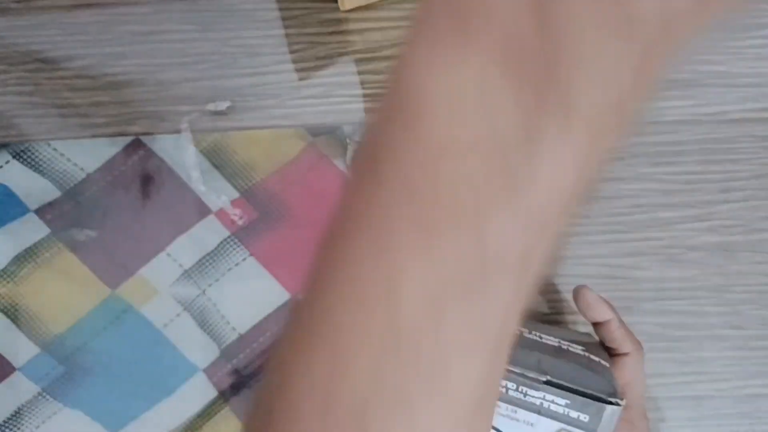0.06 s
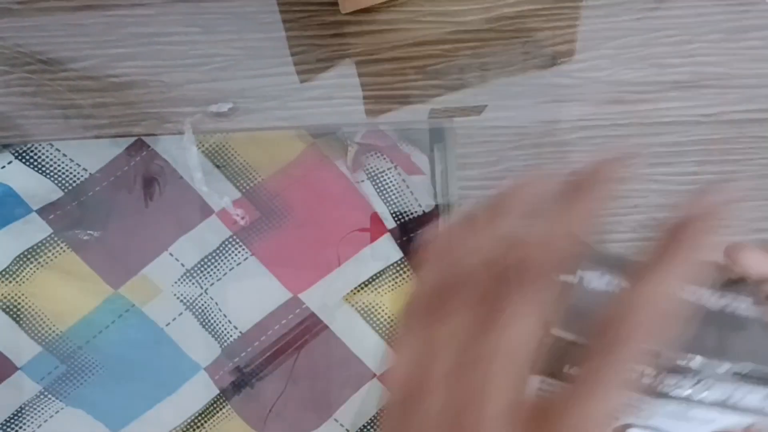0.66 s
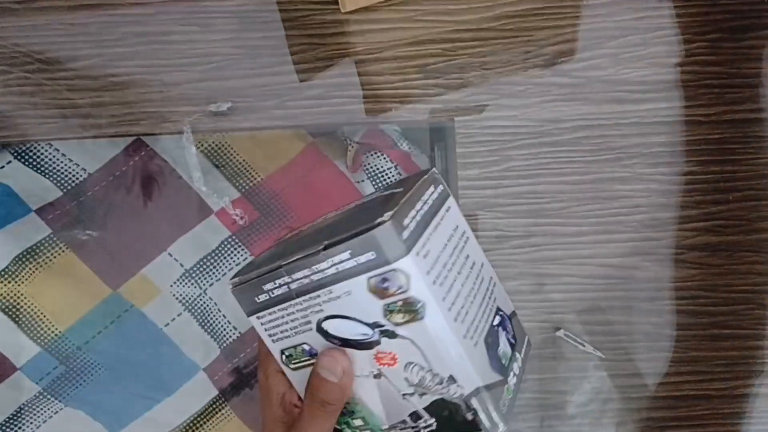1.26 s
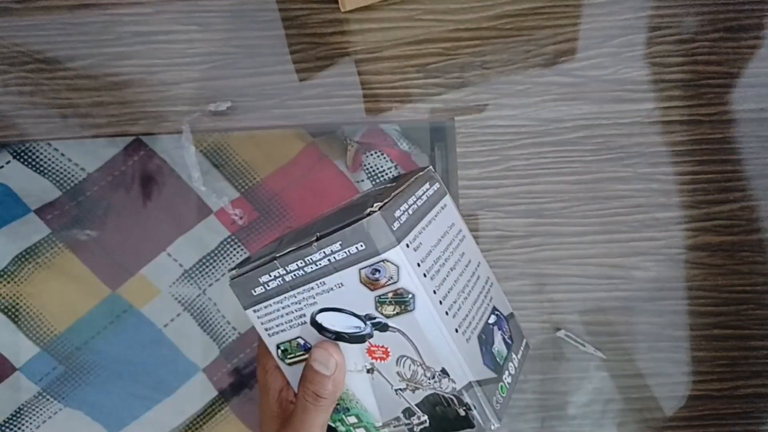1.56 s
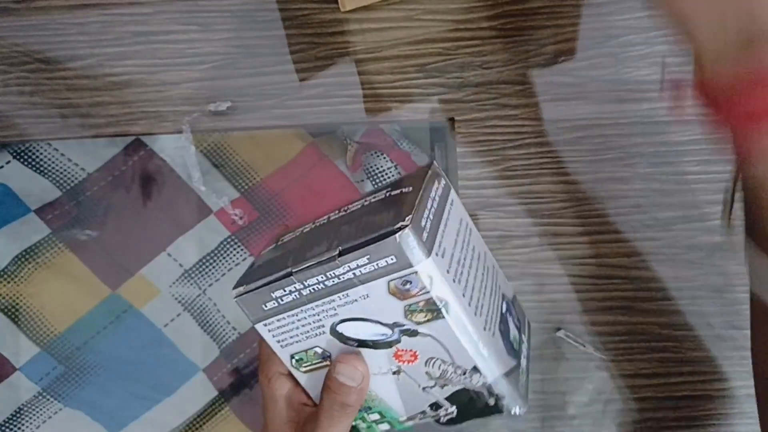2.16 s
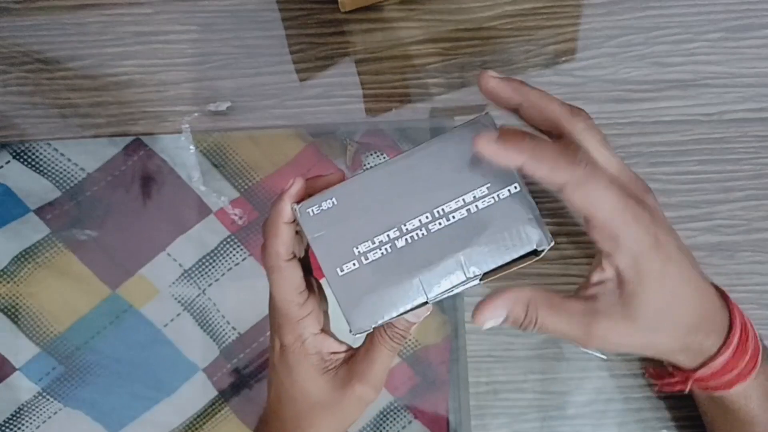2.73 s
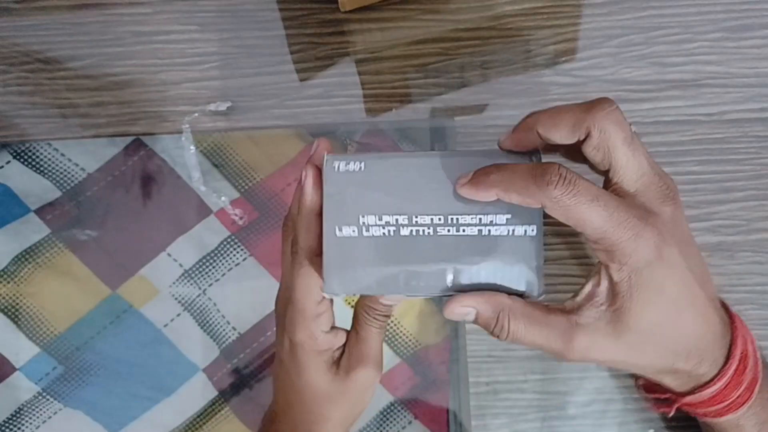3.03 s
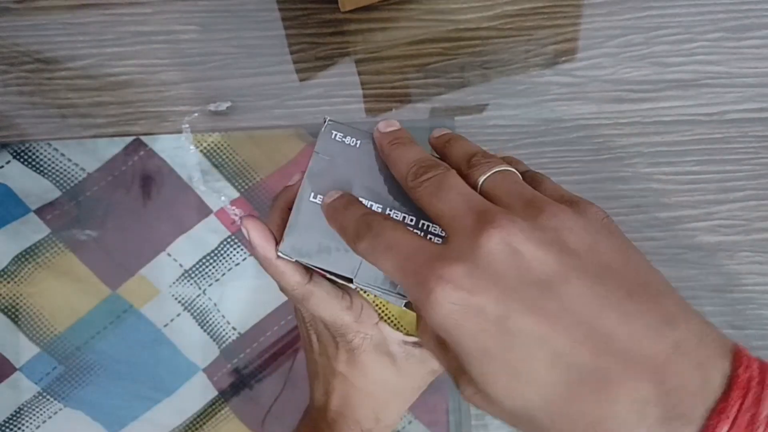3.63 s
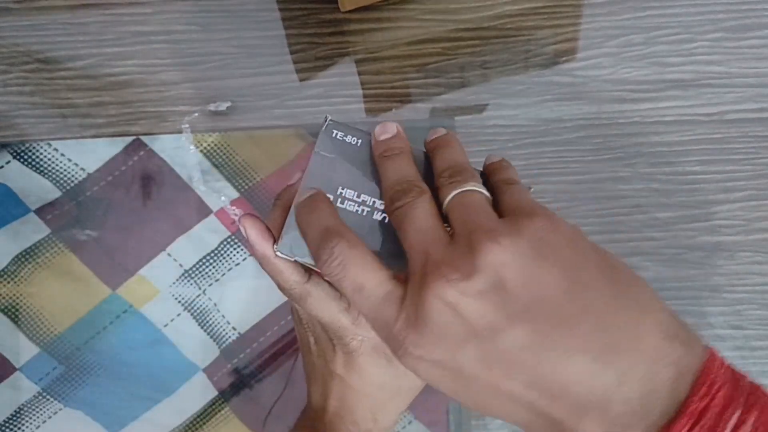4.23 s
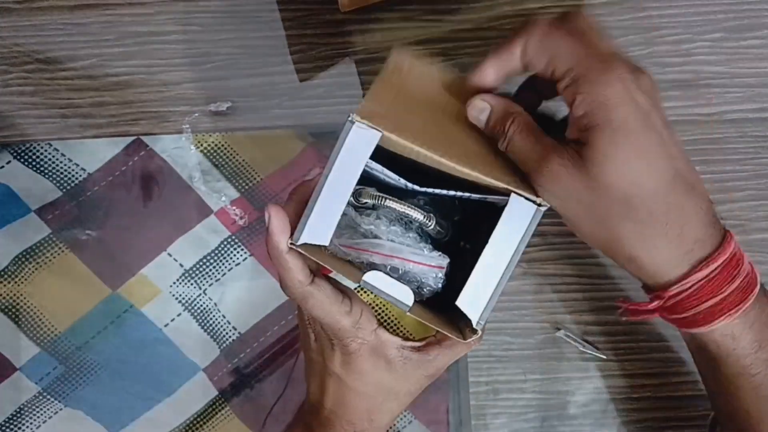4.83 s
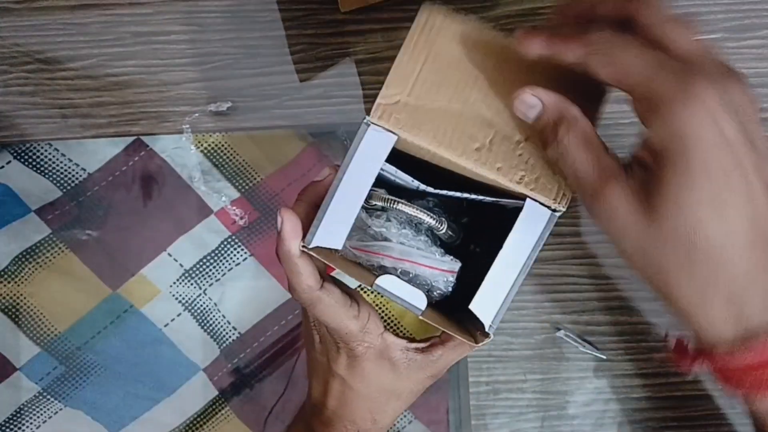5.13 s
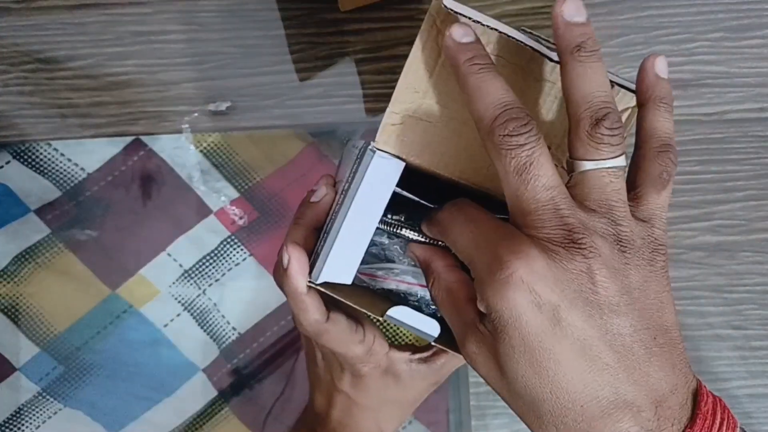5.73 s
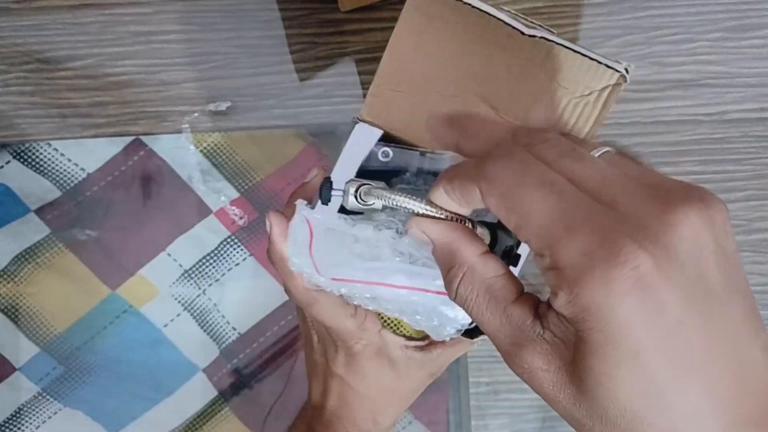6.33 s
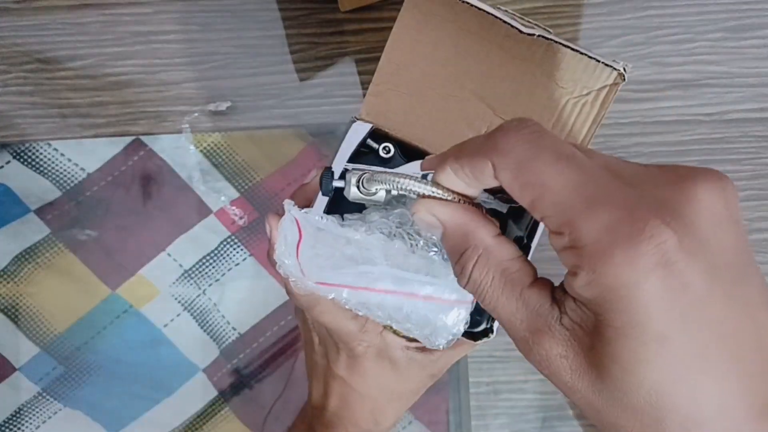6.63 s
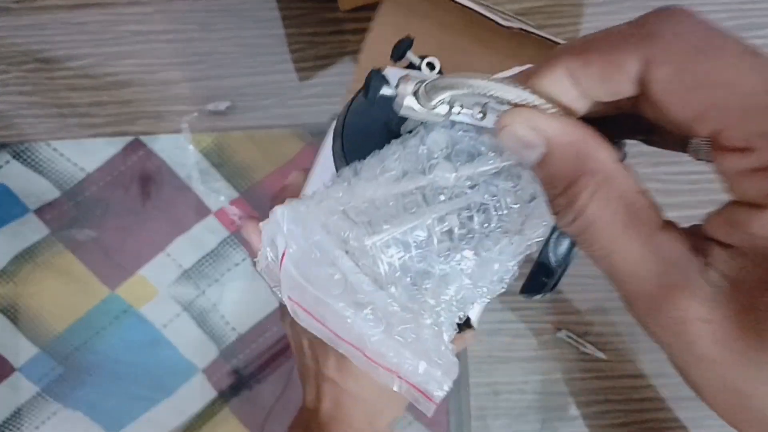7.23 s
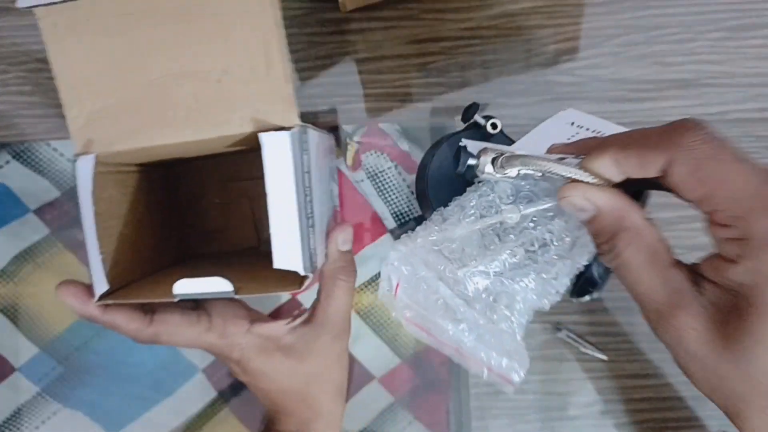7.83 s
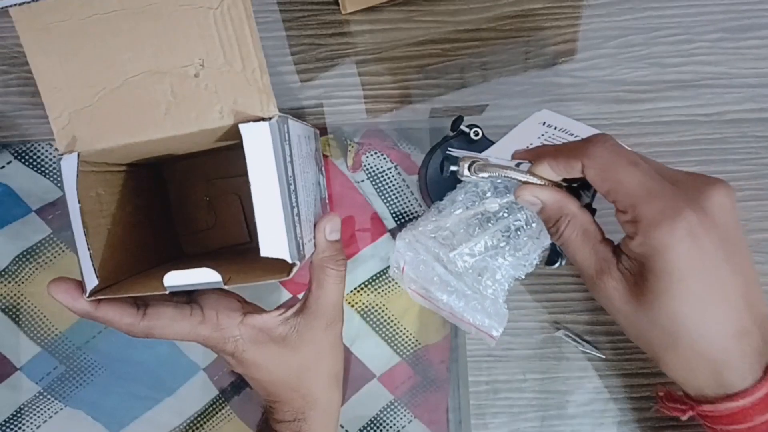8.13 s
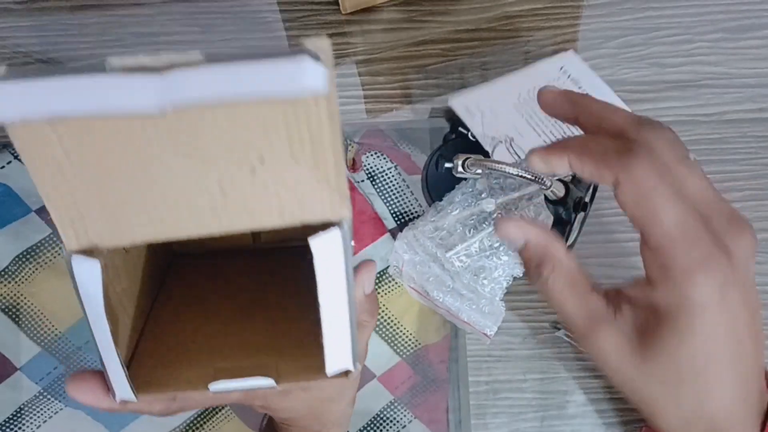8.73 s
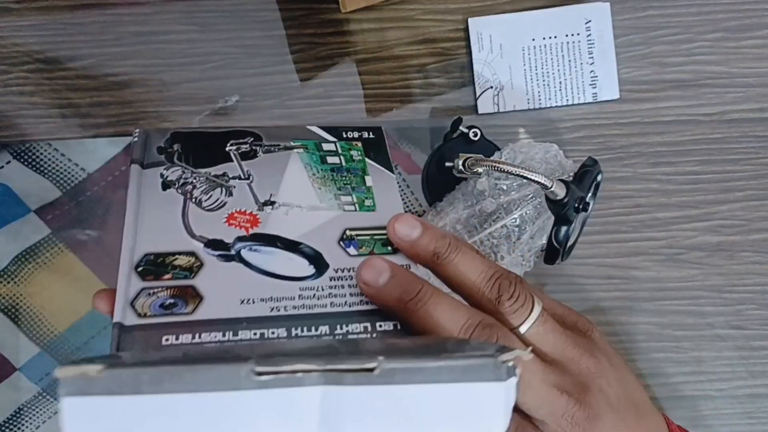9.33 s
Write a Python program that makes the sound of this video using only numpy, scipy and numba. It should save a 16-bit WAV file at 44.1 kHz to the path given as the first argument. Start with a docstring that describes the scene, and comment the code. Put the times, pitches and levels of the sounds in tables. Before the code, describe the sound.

Hands pick up and turn a small cardboard box at a table, with dry rubbing, finger knocks and brief squeaks. Creases snap and the lid flap pops free. A little stand in bubble wrap scrapes out along the tight walls, crinkling, and is set down with a clack and a short rattle. The empty box is handled again and sounds hollow. The sound is close, in a small, quiet room.

```python
"""A small room, at a table: hands pick up a small cardboard box, turn it and open it.
Skin slides and squeaks on the printed card; stick-slip friction makes the walls scrape and flex.
Fingers knock, creases snap and the lid flap pops free. A little stand in bubble wrap judders out
along the tight walls and is set down with a clack and a rattle. Then the empty box, now ringing
hollow, is handled again. A noise suppressor turns down the quiet bands."""
import sys
import numpy as np
from scipy import signal
from scipy.fft import rfft, irfft
from scipy.io import wavfile
from scipy.ndimage import uniform_filter1d
from numba import njit

SR = 44100
rng = np.random.default_rng(int(sys.argv[2]) if len(sys.argv) > 2 else 0)


def generate_wav(signal):
    """Clip the signal to [-1, 1] and save it as 16-bit WAV at the path in sys.argv[1]."""
    frames = np.transpose(np.atleast_2d(signal))
    scaled = np.clip(frames, -1, 1) * 32767
    pcm = np.round(scaled).astype(np.int16)
    wavfile.write(sys.argv[1], SR, pcm)


N = 422037
TIME = np.arange(N) / SR
SHEET_HZ = 1760   # where thin card and film speak most
GRIP_OCTAVES, GRIP_PER_S = 0.053, 2.3   # the changing grip detunes the box: spread and pace


def from_db(db):
    """Decibels to gain."""
    return 10 ** (np.asarray(db) / 20)


def rms_one(x):
    """Scale to rms 1."""
    return x / np.sqrt(np.mean(x ** 2) + 1e-20)


def energy_one(x):
    """Scale to a total energy of 1."""
    return x / np.sqrt(np.sum(x ** 2) + 1e-20)


def blow(sound, db):
    """Set a short sound's level, counted as if its energy fell within 10 ms."""
    return from_db(db) * np.sqrt(SR / 100) * energy_one(sound)


def evened(x, seconds):
    """Hold the running rms at 1, leaving the fast grain alone."""
    width = int(seconds * SR)
    power = uniform_filter1d(uniform_filter1d(x ** 2, width), width)
    return x / np.sqrt(np.abs(power) + 1e-12)


def add(out, s, sound):
    """Mix a sound in at s seconds."""
    start = round(s * SR)
    out[start:start + len(sound)] += sound[:N - start]


def at_hz(points, hz):
    """Read a table on a log-frequency axis."""
    freqs, values = np.transpose(points)
    return np.interp(np.log(np.maximum(hz, 1)), np.log(freqs), values)


def wavering(rate, size, settle=1000):
    """Slow random motion of rms 1, one value per block of samples."""
    r = np.exp(-2 * np.pi * rate * size / SR)
    noise = rng.standard_normal(N // size + settle + 1)
    return rms_one(signal.lfilter([1], [1, -2 * r, r * r], noise)[settle:])


def drift(rate):
    """Slow random motion, smooth from sample to sample."""
    slow = wavering(rate, size=40, settle=2000)
    return np.interp(np.arange(N) / 40, np.arange(len(slow)), slow)


def passed(x, low_hz, high_hz):
    """A gentle band-pass."""
    return signal.sosfilt(signal.butter(2, [low_hz, high_hz], "band", fs=SR, output="sos"), x)


def coloured(x, spectrum, size=2048):
    """Minimum-phase EQ that keeps the power of white noise."""
    gain = from_db(at_hz(spectrum, np.arange(size // 2 + 1) * SR / size))
    cepstrum = irfft(np.log(gain))
    cepstrum[1:size // 2] *= 2
    cepstrum[size // 2 + 1:] = 0
    impulse = irfft(np.exp(rfft(cepstrum)))
    return signal.oaconvolve(x, energy_one(impulse))[:len(x)]


def dying(t60, seconds):
    """An envelope that falls 60 dB in t60 seconds."""
    return np.exp(-np.log(1000) * np.arange(int(seconds * SR)) / SR / t60)


def ring(hz, t60, seconds):
    """One mode after a blow."""
    fade = dying(t60, seconds)
    return fade * np.sin(2 * np.pi * hz * np.arange(len(fade)) / SR)


def resonated(force, hz, t60):
    """One mode driven by a force."""
    r = np.exp(-np.log(1000) / (t60 * SR))
    feed = np.sqrt((1 - r * r) / 2) * np.array([1, 0, -1])
    return signal.lfilter(feed, [1, -2 * r * np.cos(2 * np.pi * hz / SR), r * r], force)


@njit
def gliding(force, angles, r, size):
    """A driven mode, retuned for each block."""
    out = np.zeros(len(force))
    for block in range(len(angles)):
        pull = 2 * r * np.cos(angles[block])
        for i in range(max(block * size, 2), min((block + 1) * size, len(force))):
            out[i] = force[i] - force[i - 2] + pull * out[i - 1] - r * r * out[i - 2]
    return out * np.sqrt((1 - r * r) / 2)


def favoured_db(hz, centre_hz, octaves, depth_db):
    """The hand mutes modes far from the favoured pitch."""
    return depth_db * (np.exp(-.5 * (np.log2(hz / centre_hz) / octaves) ** 2) - 1)


def struck(modes, centre_hz, octaves, depth_db, uneven_db, damping):
    """One blow: each mode gets a strength and a slight detuning of its own."""
    out = 0
    for (hz, db, t60), (strength, detune) in zip(modes, rng.standard_normal((len(modes), 2))):
        level_db = db + favoured_db(hz, centre_hz, octaves, depth_db) + uneven_db * strength
        out = out + from_db(level_db) * ring(hz * np.exp(0.079 * detune), t60 / damping, .1)
    return out


def rubbed(force, modes, wander_db, detune_octaves, centre_hz=None, octaves=1, depth_db=0,
           wander_per_s=4.05, size=64):
    """Friction drives the modes; their shares and pitches shift as the contact moves."""
    out = 0
    for k, (hz, db, t60) in enumerate(modes):
        favour_db = 0 if centre_hz is None else favoured_db(hz, centre_hz[::size], octaves, depth_db)
        share = from_db(db + favour_db + wander_db * wavering(wander_per_s, size))
        pitch = hz * 2 ** (detune_octaves * wavering(GRIP_PER_S, size))
        mode = gliding(force, 2 * np.pi * pitch / SR, np.exp(-np.log(1000) / (t60 * SR)), size)
        out = out + (-1) ** k * mode * np.repeat(share, size)[:N]
    return out


def clicks(per_s, spread_db):
    """Scattered impulses of uneven size."""
    sizes = from_db(spread_db * np.minimum(rng.exponential(1, N), 4)) * rng.choice([-1, 1], N)
    return sizes * (rng.random(N) < per_s / SR)


def slips(per_s, spread_db, clump_db, clump_rate, smooth):
    """Stick and slip: tiny clicks over smooth friction, swelling in clumps."""
    friction = rms_one(clicks(per_s, spread_db)) + smooth * rng.standard_normal(N)
    return friction * from_db(clump_db * drift(clump_rate))


def sheet_modes(low_hz, high_hz, t60, count):
    """Thin card and film have many irregularly spaced modes."""
    steps = (np.arange(count) + rng.uniform(.15, .85, count)) / count
    return [(hz, 10 * np.log10(hz / low_hz), t60) for hz in low_hz * (high_hz / low_hz) ** steps]


# Room tone EQ. Each row: frequency in Hz, gain in dB.
HUSH_EQ = [(30, -3), (100, -4.5), (210, -7.5), (300, -12), (700, -10.5), (1000, -14), (2500, -22),
           (6500, -20.5), (8000, -30), (10000, -33.5), (16000, -41)]
def hush():
    """A faint, dark bed of steady noise."""
    return from_db(-67) * coloured(rng.standard_normal(N), HUSH_EQ)


# The room's decay. Each row: frequency in Hz, t60 in seconds.
ROOM_DECAY = [(100, 0.051), (260, 0.55), (420, 0.27), (700, 0.29), (1840, 0.49), (4850, 0.3), (7500, 0.2),
              (13000, 0.083)]
def room(x, wet_db, gap_s, bands=14):
    """Diffuse echoes build up after a short gap and die band by band."""
    edges, tail = np.geomspace(60, 17000, bands + 1), 0
    for low, high in zip(edges, edges[1:]):
        fade = dying(at_hz(ROOM_DECAY, np.sqrt(low * high)), .5)
        tail = tail + fade * passed(rng.standard_normal(len(fade)), low, high)
    build_up = np.clip(np.arange(len(tail)) / SR / gap_s - .5, 0, 1)
    return from_db(wet_db) * signal.oaconvolve(x, energy_one(tail * build_up))[:N]


# Fingertip zips. Each row: start and end in seconds, first and last pitch in Hz, level in dB,
# roughness from 0 to 1.
FINGER_ZIPS = [(2.514, 2.63, 10400, 11800, -71, 1), (4.533, 4.61, 11200, 12000, -69, .8),
               (4.61, 4.71, 10000, 10800, -77, 0.7), (5.003, 5.166, 12100, 10500, -87, .1),
               (5.272, 5.325, 9080, 8700, -90.5, 0), (8.768, 8.817, 10400, 11700, -70, 1)]
def zips():
    """Fine ridges passing under a fingertip give a faint whistle that glides with its speed."""
    out = np.zeros(N)
    for start, end, first_hz, last_hz, db, rough in FINGER_ZIPS:
        hz = np.linspace(first_hz, last_hz, round((end - start) * SR))
        jitter = rms_one(signal.lfilter([1], [1, -.98], rng.standard_normal(SR)))[:len(hz)]
        tone = np.sin(2 * np.pi * np.cumsum(hz + 420 * rough * jitter) / SR)
        add(out, start, from_db(db) * rms_one(tone * signal.windows.tukey(len(tone), .8)))
    return out


# The stand's metal arm. Each row: pitch in Hz, gain in dB, t60 in seconds.
ARM_MODES = [(2180, -1.5, 0.46), (2616, -2, 0.3), (4097, -2, 0.27), (5180, -8, 0.2), (5950, -9, 0.15)]
# Jolts to the arm. Each row: time in seconds, level in dB.
ARM_JOLTS = [(5.193, -57.5), (8.208, -54)]
def arm():
    """The metal arm pings faintly when the stand is jolted."""
    out = np.zeros(N)
    for s, db in ARM_JOLTS:
        add(out, s, sum(from_db(db + mode_db) * ring(hz, t60, .5) for hz, mode_db, t60 in ARM_MODES))
    return out


# Squeaks. Each row: start and end in seconds, pitch in Hz, t60 in seconds, level in dB.
CARD_SQUEAKS = [(0.491, 0.524, 620, 0.015, -43), (0.574, 0.79, 2300, 0.0076, -54),
                (0.688, 0.72, 546, 0.031, -54), (2.56, 3.118, 1796, 0.017, -48),
                (2.867, 2.891, 666, 0.13, -26.5), (2.887, 2.901, 686, 0.074, -21),
                (3.288, 3.7, 3670, 0.018, -57), (3.962, 4.057, 778, 0.11, -41.5),
                (4.24, 4.37, 1410, 0.026, -41.5), (4.399, 4.425, 456, 0.034, -22),
                (4.388, 4.44, 940, 0.024, -28.5), (5.183, 5.213, 780, 0.028, -41),
                (5.19, 5.305, 1950, 0.014, -61), (5.688, 5.827, 684, 0.056, -55.5),
                (6.81, 6.82, 875, 0.044, -46), (6.897, 6.942, 840, 0.0036, -28),
                (6.887, 7.076, 3460, 0.009, -51), (7.288, 7.314, 650, 0.04, -46),
                (7.34, 7.41, 674, 0.038, -40), (7.467, 7.482, 750, 0.04, -37),
                (7.693, 7.787, 2420, 0.004, -57), (8.619, 8.676, 650, 0.08, -62),
                (8.626, 8.749, 1350, 0.08, -66), (8.814, 8.937, 715, 0.039, -56),
                (9.17, 9.229, 1210, 0.011, -45)]
def squeaks():
    """Skin or film catches on the card and one resonance sings, swelling and letting go."""
    out = np.zeros(N)
    force = slips(per_s=3900, spread_db=-1, clump_db=7.5, clump_rate=97, smooth=0.41)
    for start, end, hz, t60, db in CARD_SQUEAKS:
        stroke = force[round(start * SR):round(max(end, start + .01) * SR)]
        tone = evened(passed(resonated(stroke, hz, t60), 0.74 * hz, 1.25 * hz), 0.0051)
        add(out, start, from_db(db) * rms_one(tone * signal.windows.tukey(len(tone), .5)))
    return out


# The stand, and the table top under it. Each row: pitch in Hz, gain in dB, t60 in seconds.
STAND_MODES = [(573, 7, 0.032), (650, -1, 0.064), (761, 6.5, 0.025), (937, 7, 0.034), (1023, 6.5, 0.027),
               (1550, 4.5, 0.0086), (1846, 10, 0.0062), (2110, 3, 0.016), (2600, -6.5, 0.014)]
TABLE_MODES = [(89, -33.5, 0.33), (110, -45, 0.89), (192.3, -33, 0.19)]
# The base touches down, then its other edge. Each row: time in seconds, level in dB.
TOUCHDOWNS = [(8.2068, -17), (8.2135, -31)]
def stand(down_s=8.207, damping=1.44, rattle_db=-36):
    """The stand lands with a clack, its loose joints chatter to rest and the table top swings."""
    out = np.zeros(N)
    for s, db in TOUCHDOWNS:
        clack = 0
        for k, (hz, mode_db, t60) in enumerate(STAND_MODES):
            gain = (-1) ** k * from_db(mode_db + rng.normal(0, 1))
            clack = clack + gain * ring(hz, t60 / damping, .1)   # the table shortens the ring
        add(out, s, blow(passed(clack, 700, 3600), db))
    joints = slips(per_s=730, spread_db=2.5, clump_db=-2.5, clump_rate=74, smooth=0.26)
    fade, rattle = dying(t60=0.45, seconds=.6), 0
    chatter = evened(joints, 0.018)[:len(fade)]
    for k, (hz, db, t60) in enumerate(STAND_MODES):
        force = chatter * fade ** ((hz / 800) ** 0.23)   # high modes settle first
        rattle = rattle + (-1) ** k * from_db(db) * resonated(force, hz, t60)
    add(out, down_s, from_db(rattle_db) * passed(rattle, 350, 1800))
    add(out, down_s, sum(from_db(db) * ring(hz, t60, .6) for hz, db, t60 in TABLE_MODES))
    return out


# Two pulls as one curve. Each row: time in seconds, level before trim in dB, favoured pitch in Hz.
PULL_CURVE = [(5.8, -49.5, 569), (5.826, -32.5, 582), (5.876, -31, 829), (5.9, -22.5, 849),
              (5.948, -21, 680), (5.996, -21, 643), (6.038, -28, 581), (6.086, -36, 642), (6.112, -27, 681),
              (6.168, -16, 607), (6.334, -22.5, 613), (6.336, -27.5, 616), (6.44, -39, 577)]
# Walls stretched by the stand. Each row: pitch in Hz, gain in dB, t60 in seconds.
TIGHT_MODES = [(396, -7.5, 0.023), (527, -3, 0.027), (563, -1.5, 0.049), (629, -6, 0.024), (760, -8, 0.044),
               (897, -9.5, 0.022), (1048, -7.5, 0.036), (1360, -8.5, 0.013)]
def pulling(trim_db=-0.76, fade_s=0.013):
    """The wrapped stand judders up along the tight walls: a dry, coarse scrape."""
    s, db, hz = np.transpose(PULL_CURVE)
    judder = slips(per_s=1300, spread_db=2, clump_db=2, clump_rate=40, smooth=0.46)
    walls = rubbed(judder, TIGHT_MODES, wander_db=0, detune_octaves=0.035,
                   centre_hz=np.interp(TIME, s, hz), octaves=0.68, depth_db=15)
    touching = np.clip(np.minimum(TIME - s[0], s[-1] - TIME) / fade_s, 0, 1)
    level = touching * from_db(np.interp(TIME, s, db) + trim_db)
    return level * evened(passed(walls, 340, 1400), 0.016)


# EQs for the slide, its fizz and its crackle. Each row: frequency in Hz, gain in dB.
SLIDE_EQ = [(1500, -22), (2800, -18), (3800, -8), (5200, -3.5), (6500, 1.5), (7300, -3.5), (8500, -16.5),
            (10000, -19.5), (16000, -37.5)]
FIZZ_EQ = [(5000, -18), (7500, -11), (9000, -8.5), (11500, -6), (13700, -9), (14900, -4.5), (16000, 4.5)]
CRACKLE_EQ = [(1000, -17), (2500, -2), (4000, -2.5), (7000, 6), (9000, -10.5), (12000, -8), (16000, -7.5)]
def sliding(skin, db, crackles_per_s=1200, ring_cycles=80, pitches=22):
    """Skin hisses over printed card; fibres fizz and single creases pop, each at its own pitch."""
    surface = rubbed(skin, sheet_modes(3230, 7850, t60=0.004, count=15),
                     wander_db=5.5, wander_per_s=11, detune_octaves=0.028)
    surface = rms_one(surface) + rms_one(passed(skin, 2100, 8200))
    slide = from_db(db) * evened(coloured(surface, SLIDE_EQ), 0.057)
    fibres = rubbed(skin, sheet_modes(7800, 16000, t60=0.0059, count=22),
                    wander_db=3.5, wander_per_s=16, detune_octaves=0.033)
    fibres = rms_one(fibres) + 1.4 * rms_one(skin)
    fizz_db = -49.5 + 1.6 * (db + 43.5)   # needs a firm stroke: grows faster than the slide
    fizz = from_db(fizz_db) * evened(coloured(fibres, FIZZ_EQ), 0.062)
    kicks, dealt = clicks(crackles_per_s, spread_db=1), rng.integers(0, pitches, N)
    pops = sum(resonated(kicks * (dealt == k) + 1e-18, hz, ring_cycles / hz)
               for k, hz in enumerate(np.geomspace(2200, 12700, pitches)))
    crackle = from_db(db - 11) * coloured(rms_one(pops), CRACKLE_EQ)
    return slide + fizz + crackle


# EQs for crinkling sheets and their small catches. Each row: frequency in Hz, gain in dB.
CRINKLE_EQ = [(600, -35.5), (950, 0.5), (1250, 2), (1700, -6), (2300, -5), (3200, -5.5), (4200, -9.5),
              (8000, -28.5), (11000, -41)]
CATCH_EQ = [(700, -17.5), (1300, -1.5), (2500, -1.5), (4000, 0.5), (6500, 1), (8500, -14), (16000, -28)]
def crinkling(creases, db, centre_hz):
    """Thin card and film crinkle; here and there the surface catches and lets go with a tick."""
    sheets = rubbed(creases, sheet_modes(1071, 4400, t60=0.02, count=24), wander_db=2,
                    detune_octaves=0.06, centre_hz=centre_hz, octaves=0.5, depth_db=11)
    sheets = rms_one(sheets) + 0.62 * rms_one(passed(creases, 1150, 3600))   # plus dry friction
    crinkle = from_db(db) * evened(coloured(sheets, CRINKLE_EQ), 0.077)
    catches = slips(per_s=140, spread_db=2, clump_db=2.5, clump_rate=14, smooth=0)
    return crinkle + from_db(db - 11) * passed(coloured(catches, CATCH_EQ), 600, 6500)


# Air in the empty box: deep mode, then cross mode. Each row: pitch in Hz, t60 in seconds.
AIR_MODES = [(243, 0.27), (750, 0.056)]
def hollow(drag, mode, db, empty_from_s=7.25):
    """Once the stand is out, the air in the box rings hollow."""
    empty = np.clip((TIME - empty_from_s) / 0.044, 0, 1)
    return from_db(db) * resonated(drag * empty, *AIR_MODES[mode])


# Low bending of the box and the table under it. Each row: pitch in Hz, gain in dB, t60 in seconds.
BEND_MODES = [(78, -3.5, 0.042), (110.6, 7, 0.11), (153, -6, 0.011), (195.6, 4.5, 0.11), (271, 8, 0.1)]
def flexing(drag, db, centre_hz):
    """The box bends in the hand, giving in fits and starts."""
    bending = rubbed(drag, BEND_MODES, wander_db=5.5, detune_octaves=GRIP_OCTAVES,
                     centre_hz=centre_hz, octaves=.4, depth_db=30.5)
    body = passed(bending + hollow(drag, mode=0, db=-19), 75, 540)
    return from_db(db + 4.5 * drift(5.8)) * evened(body, 0.025)


def thump(hz, db):
    """The whole box bends under a blow."""
    bending = struck(BEND_MODES, hz, octaves=.5, depth_db=18, uneven_db=2, damping=1.1)
    return blow(passed(bending, 55, 330), db)


# The box walls and the air inside. Each row: pitch in Hz, gain in dB, t60 in seconds.
WALL_MODES = [(322, -4, 0.063), (386.3, -1, 0.082), (499, -1, 0.051), (584.7, -3, 0.058), (680, -2, 0.05),
              (780.5, -0.5, 0.043), (896, 0, 0.019), (1078, -1, 0.022), (1410, -1, 0.007)]
def scraping(drag, db, centre_hz):
    """Drag sets the walls ringing: a boxy midrange scrape."""
    walls = rubbed(drag, WALL_MODES, wander_db=2.5, detune_octaves=GRIP_OCTAVES,
                   centre_hz=centre_hz, octaves=0.49, depth_db=8.5)
    body = passed(walls + hollow(drag, mode=1, db=4), 240, 1700)
    return from_db(db) * evened(body, 0.021)


# Strokes along the box. Each row: start and length in seconds, swell in dB, base release in dB per
# second, bending and wall pitch in Hz, then mid-stroke levels in dB of flex, scrape, crinkle, slide.
HAND_STROKES = [(0.002, 0.15, 8.5, 115, 147, 623, -62.5, -65, -42.5, -46),
                (0.136, 0.13, 4, 101.5, 86, 574, -54.5, -42, -44.5, -43.5),
                (0.417, 0.55, -2, 272, 124, 536, -61, -60, -56.5, -58),
                (0.763, 0.0093, 4.5, 263.5, 204, 680, -39, -42, -42.5, -42),
                (0.847, 0.074, -2.5, 259.5, 207, 650, -48, -37.5, -41.5, -46.5),
                (1.127, 0.011, 4, 371, 172, 694, -51, -48.5, -55, -59),
                (1.264, 0.11, -3.5, 68.5, 164, 930, -50, -39, -36, -37.5),
                (1.58, 0.019, -8, 158.5, 236, 718, -56.5, -43, -39.5, -49.5),
                (1.724, 0.23, 22.5, 106, 256, 650, -90.5, -85, -54, -46),
                (1.949, 0.056, 3, 159, 188, 650, -50.5, -32.5, -34.5, -36),
                (2.399, 0.012, -11, 154, 163, 740, -48, -44.5, -56, -53),
                (2.446, 0.019, -10, 61, 190, 539, -45.5, -34.5, -40.5, -47.5),
                (2.558, 0.29, 3, 118, 121, 556, -58.5, -41.5, -49.5, -55),
                (2.862, 0.034, -5.5, 84, 180, 640, -52, -34.5, -44.5, -46.5),
                (2.991, 0.092, 4, 195.5, 270, 607, -76.5, -35.5, -45, -49.5),
                (3.183, 0.036, 7, 202, 260, 656, -66, -38.5, -55.5, -56),
                (3.236, 0.14, 4.5, 71, 286, 500, -51.5, -42, -45.5, -48.5),
                (3.456, 0.027, -3, 224, 290, 518, -39, -30, -40.5, -49),
                (3.527, 0.039, 6.5, 147.5, 242, 534, -36.5, -28.5, -39.5, -49.5),
                (3.805, 0.067, 3.5, 171, 120, 594, -52, -43.5, -42, -48.5),
                (3.983, 0.063, 14.5, 333, 185, 860, -46.5, -37.5, -44, -61),
                (4.135, 0.12, -1, 398, 222, 730, -47.5, -33.5, -42.5, -48.5),
                (4.243, 0.045, -2.5, 223.5, 230, 610, -24.5, -23, -32.5, -36),
                (4.417, 0.08, -2.5, 142.5, 230, 560, -35, -27, -37, -39.5),
                (4.573, 0.15, 9, 139, 157, 760, -63, -45, -51.5, -48),
                (4.712, 0.038, 22.5, 149, 231, 784, -54, -41, -41, -41.5),
                (4.95, 0.071, -8.5, 200, 220, 618, -54, -37, -44.5, -44),
                (5.2, 0.014, -9.5, 212, 190, 824, -81.5, -52, -51, -61),
                (5.579, 0.089, -4.5, 140, 202, 704, -59.5, -60, -58.5, -64.5),
                (5.82, 0.17, 7, 117.5, 228, 790, -36.5, -33, -37, -44),
                (6.137, .16, 0, 162, 223, 700, -32.5, -35, -33, -36),
                (6.438, 0.14, -2.5, 148, 226, 710, -53.5, -39.5, -55.5, -56),
                (6.68, 0.22, -1.5, 299, 270, 760, -44, -34, -47, -47),
                (6.907, 0.096, 3, 210, 240, 770, -49, -30, -39.5, -47),
                (7.15, 0.015, -13.5, 147.5, 225, 636, -68, -47, -72, -56.5),
                (7.307, 0.046, 5, 230, 189, 660, -50, -53, -66, -57),
                (7.367, 0.058, 3.5, 283, 159, 620, -38, -41.5, -49.5, -56),
                (7.467, 0.076, -1, 97, 190, 560, -49.5, -45.5, -55, -57.5),
                (7.707, 0.016, 3.5, 284, 206, 637, -47, -44, -45, -47),
                (8.371, 0.038, -4.5, 151, 135.5, 630, -42.5, -47, -65, -62.5),
                (8.514, 0.06, 5, 487, 105, 634, -53, -68, -65.5, -61.5),
                (8.708, 0.14, -11, 128, 195, 1114, -71, -68.5, -60, -58),
                (8.848, 0.078, -8, 352, 250, 745, -52.5, -74, -52.5, -54.5),
                (9.041, 0.03, -1.5, 154, 237, 750, -55.5, -57, -67, -63.5),
                (9.13, 0.058, 3, 231, 227, 810, -47, -39.5, -50.5, -47.5),
                (9.425, 0.092, 12.5, 224, 199, 584, -57, -49.5, -64, -58.5)]
def strokes(lift_off_s=0.96, wander_octaves=0.077, wander_per_s=7.8):
    """Each stroke takes hold, swells or eases, and dies; the strongest steers the resonances."""
    t = np.arange(0, N / SR + .002, .001)
    attack_s = np.array([.025, .032, .042, .05])[:, None]   # flex, scrape, crinkle, slide
    release_factor = np.array([1.24, 0.94, 0.88, 1.01])[:, None]   # the palm damps the flex fastest
    power, bend, wall = 0, 0, 0
    for start, length, swell_db, release, bend_hz, wall_hz, *layer_db in HAND_STROKES:
        attack = np.clip(1 + (t - start) / attack_s, 0, 1) ** 2
        hold_db = swell_db * (np.clip((t - start) / length, 0, 1) - .5)
        after = np.maximum(t - start - length, 0)
        touching = np.clip(1 - (after / lift_off_s) ** 3, 0, 1)
        level_db = np.array(layer_db)[:, None] + hold_db - release * release_factor * after
        stroke_power = (attack * touching * from_db(level_db)) ** 2 + 1e-20
        power = power + stroke_power
        bend = bend + stroke_power[0] * bend_hz
        wall = wall + stroke_power[1] * wall_hz
    levels_db = [np.interp(TIME, t, 10 * np.log10(p)) for p in power]
    # the contact wanders, and with it the resonances that speak
    centres_hz = [np.interp(TIME, t, hz) * 2 ** (wander_octaves * drift(wander_per_s))
                  for hz in (bend / power[0], wall / power[1], np.full(len(t), SHEET_HZ))]
    return levels_db, centres_hz


def rubbing():
    """Hands and wrapped stand move against the box: three grains of friction, coarse to fine."""
    (flex_db, scrape_db, crinkle_db, slide_db), (bend_hz, wall_hz, sheet_hz) = strokes()
    drag = slips(per_s=1100, spread_db=2.5, clump_db=3, clump_rate=40, smooth=0.34)
    creases = slips(per_s=1500, spread_db=1, clump_db=2, clump_rate=31, smooth=1) + .5 * drag
    skin = slips(per_s=10000, spread_db=5, clump_db=2.5, clump_rate=29, smooth=1) + 0.68 * creases
    body = flexing(drag, flex_db, bend_hz) + scraping(drag, scrape_db, wall_hz)
    return body + crinkling(creases, crinkle_db, sheet_hz) + sliding(skin, slide_db)


def crack(spectrum, t60, chatter, rise_s=0.00051):
    """Fibres give way one after another: a snap and a short burst of micro-snaps."""
    fade = dying(t60, .06)
    swell = 1 - np.exp(-np.arange(len(fade)) / SR / rise_s)
    burst = chatter * energy_one(swell * fade * rng.laplace(size=len(fade)))
    burst[0] += 1
    return coloured(burst, spectrum)


# EQ for the tick of a card edge. Each row: frequency in Hz, gain in dB.
TICK_EQ = [(700, -15.5), (2200, -21), (3800, -8), (5200, 6), (6500, 8.5), (8500, -6), (11500, -12),
           (13700, -8.5), (14900, -2.5), (16000, -10)]
def edge(clack_db, tick_db, sheet_hz, burst_t60, soft_db=-50, hard_db=-30):
    """An edge of card gives way: a clack of the sheet and a sharp tick."""
    snap = crack(CRINKLE_EQ, burst_t60, chatter=4)
    clack = energy_one(snap) + 1.2 * energy_one(resonated(snap, sheet_hz, t60=0.0051))
    # a gentle touch is a longer contact and lacks the top octave
    hardness = np.clip((tick_db - soft_db) / (hard_db - soft_db), 0, 1)
    top_cut = signal.butter(3, 7800 * 2 ** (1.3 * hardness), fs=SR, output="sos")
    tick = signal.sosfilt(top_cut, crack(TICK_EQ, burst_t60, chatter=6))
    return blow(clack, clack_db) + blow(tick, tick_db)


# Soft bumps. Each row: time in seconds, level in dB, favoured pitch in Hz.
TABLE_BUMPS = [(0.228, -34, 88), (0.445, -38.5, 106.3), (0.468, -38.5, 106.6), (0.498, -34.5, 131),
               (0.528, -36.5, 117.6), (0.87, -43.5, 169), (0.892, -31, 104.8), (0.907, -40.5, 110),
               (2.348, -37, 118), (2.495, -44, 110), (3.497, -32.5, 108), (3.886, -41, 108),
               (4.046, -39, 192), (4.248, -29.5, 215), (4.462, -43.5, 104.7), (4.53, -41.5, 104.2),
               (4.585, -44, 110), (4.813, -42, 152.3), (7.327, -32, 179), (8.364, -40, 262),
               (8.368, -30, 143)]
def bumps():
    """Hand or box thumps on the cloth-covered table."""
    out = np.zeros(N)
    for s, db, hz in TABLE_BUMPS:
        add(out, s, thump(hz, db))
    return out


# Snaps. Each row: time in seconds, tick level in dB, clack relative to the tick in dB,
# sheet pitch in Hz, t60 of the burst in seconds.
CARD_SNAPS = [(0.7555, -36.5, 4, 1680, 0.0039), (0.763, -39, -0.5, 2400, .036),
              (0.804, -57, 17.5, 1750, 0.034), (0.8633, -45, 10, 1450, 0.019),
              (1.228, -61.5, 20, 1280, 0.066), (1.286, -34, 5, 1780, 0.059), (1.371, -37.5, 1, 1750, 0.017),
              (1.398, -41.5, 7, 1710, 0.011), (1.572, -51, 16, 1670, .036),
              (1.872, -42.5, -11.5, 1800, .01), (1.969, -25, -7.5, 1850, .028),
              (2.274, -48, 6, 4000, 0.022), (2.353, -49, -7, 3700, .035), (2.431, -45.5, 13, 1860, .02),
              (2.892, -41, -3, 1800, .012), (3.362, -61, -12, 2000, .012), (3.587, -38, 2.5, 3800, 0.011),
              (3.604, -36.5, 7, 3780, 0.025), (3.797, -48, 12.5, 3700, 0.02),
              (3.8333, -26, 2.5, 3700, 0.02), (4.023, -43.5, 6.5, 3400, 0.032),
              (4.264, -40, -12, 1600, 0.0088), (4.266, -28.5, 5, 1570, 0.023),
              (4.41, -25, -19, 1500, 0.071), (4.43, -24.5, -2.5, 4300, .02), (4.746, -42, 2, 2200, 0.03),
              (4.76, -22, -2.5, 2470, 0.042), (4.784, -48, 12, 2000, 0.0082),
              (4.916, -43.5, -10, 2000, 0.037), (4.948, -37.5, -10.5, 2000, 0.023),
              (5.996, -34.5, -6.5, 1700, 0.043), (6.15, -32, 2, 1500, 0.046),
              (6.158, -33.5, 6, 1670, 0.033), (6.546, -50, 4, 1690, .025), (6.68, -39.5, 6, 1570, 0.0092),
              (6.795, -55, 9, 1700, .012), (6.869, -42, 1.5, 1690, 0.013), (6.908, -53, -4, 1700, .036),
              (6.934, -54, 18, 1800, 0.042), (7.03, -39, 3, 1610, 0.049), (7.142, -44.5, -17, 1700, 0.011),
              (7.363, -41.5, -19, 1600, 0.081), (7.551, -47.5, -6.5, 1900, .014),
              (8.061, -65.5, -6.5, 2600, .03), (8.208, -38.5, 8, 1900, 0.079),
              (8.385, -65, -14, 1980, 0.013), (8.506, -70, -12, 2020, .01), (8.632, -54, -6, 3740, .05),
              (8.913, -51, -6, 2600, .016), (8.937, -45, -9, 2690, 0.011), (9.118, -41, -8, 1610, .025),
              (9.14, -41.5, -12, 1600, .02), (9.153, -38.5, -17, 1490, 0.013), (9.166, -38, -3, 1390, .035),
              (9.183, -38, -4, 1490, .035), (9.193, -33, -2.5, 1600, .022), (9.492, -43, -20, 2400, 0.019)]
def snaps():
    """Creases and card edges snap."""
    out = np.zeros(N)
    for s, db, clack_db, sheet_hz, burst_t60 in CARD_SNAPS:
        add(out, s, edge(db + clack_db, db, sheet_hz, burst_t60))
    return out


# The stiff printed face. Each row: pitch in Hz, gain in dB, t60 in seconds.
FACE_MODES = [(1130, 3, 0.035), (1488, -2, 0.019), (1880, -4, 0.0085), (2360, -8, 0.033)]
# Knocks of fingers, box and stand. Each row: time in seconds, level in dB, wall pitch in Hz,
# then weight (the thump) and hardness (the edge clack), both in dB relative to the knock.
BOX_KNOCKS = [(0.137, -31.5, 660, -11.5, -5), (0.754, -18.5, 634, -9, -21), (0.763, -23, 640, -2, -10),
              (0.806, -33, 580, -15, -7), (0.864, -29, 704, -20, -13), (0.868, -16.5, 577, -5, -16),
              (0.876, -20.5, 560, -19, -23), (1.127, -33.5, 666, -5, -25), (1.971, -23.5, 674, -11.5, -0.5),
              (2.017, -21, 704, -21, -11), (2.384, -32, 820, -11, -10.5), (2.437, -31, 540, 1.5, -11),
              (2.624, -21, 520, -10, -13.5), (2.877, -33, 684, -8, -7.5), (2.893, -34.5, 685, -4.5, -9),
              (3.459, -23.5, 495, -12, -40.5), (3.466, -22.5, 470, -15, -11.5),
              (3.545, -33.5, 420, -12, -25), (3.569, -24, 400, -8, -20), (3.588, -22.5, 576, -12, -8),
              (3.604, -37, 450, -20, -9), (3.798, -21, 630, -1.5, -7.5), (4.025, -37, 770, -11, -6),
              (4.138, -28.5, 865, -28, -5), (4.248, -21, 460, -17.5, -7), (4.267, -19.5, 755, -19.5, -15.5),
              (4.396, -29.5, 620, -26.5, -6), (4.411, -25, 700, -33, -5.5), (4.421, -32, 636, -8, -12),
              (4.432, -14.5, 655, -9.5, -29), (4.701, -35, 350, -15, -16), (4.746, -30, 483, -20, -10),
              (4.759, -25, 855, -20, -9), (4.785, -33.5, 810, -8, -17), (4.947, -30.5, 580, -20, -25),
              (5.192, -46, 840, -41, 3), (5.63, -52, 453, -6, -23), (6, -20, 620, -22, -21),
              (6.269, -19.5, 594, -24, -10), (6.68, -41, 776, -27, -3), (6.906, -31.5, 800, -25, -14),
              (7.002, -25.5, 750, -27, -14), (7.034, -26, 730, -27, -17), (7.141, -35, 674, -17, -19),
              (7.323, -39.5, 557, -17, -47), (7.373, -33.5, 546, -8, -23), (7.47, -37, 543, -3, -11),
              (7.55, -35.5, 716, -27, -10.5), (7.744, -48.5, 578, 4, -13.5), (8.632, -48, 715, -8, -14),
              (9.118, -39, 794, -11, -3), (9.155, -55, 807, -8, -8), (9.192, -35, 760, -5, -28)]
def knocks():
    """A knock rings the walls, bends the box, catches an edge and clacks the printed face."""
    out = np.zeros(N)
    for s, db, wall_hz, weight_db, hardness_db in BOX_KNOCKS:
        walls = struck(WALL_MODES, wall_hz, octaves=.5, depth_db=15, uneven_db=2, damping=1.25)
        rounded = passed(passed(walls, 230, 1700), 45, 1400)   # flesh on card is a soft contact
        add(out, s, blow(rounded, db))
        add(out, s, thump(hz=217, db=db + weight_db))
        clack_db = db + hardness_db
        add(out, s, edge(clack_db, tick_db=clack_db - 11.5, sheet_hz=SHEET_HZ, burst_t60=0.067))
        face = struck(FACE_MODES, SHEET_HZ, octaves=1, depth_db=1.5, uneven_db=4, damping=0.87)
        add(out, s, blow(passed(face, 760, 3700), db - 14.5 + 0.29 * hardness_db))
    return out


def scene():
    """All the handling, its echo and the room tone, in mono."""
    box = rubbing() + pulling() + knocks() + bumps() + snaps() + squeaks() + zips()
    direct = box + stand() + arm()
    return (direct + room(direct, wet_db=-16, gap_s=0.015) + hush())[None]


# Where the suppressor closes. Each row: frequency in Hz, threshold in dB.
GATE_THRESHOLD = [(100, -77.5), (250, -60.5), (500, -75.5), (1000, -70), (2500, -84), (6000, -85),
                  (9000, -101), (12000, -101.5), (15000, -93)]
def suppressed(x, floor_db, size=1024):
    """Noise suppressor: bands that sink toward the threshold are turned down."""
    framing = dict(fs=SR, nperseg=size, noverlap=size * 3 // 4)
    hz, _, frames = signal.stft(x, **framing)
    power = uniform_filter1d(uniform_filter1d(np.abs(frames) ** 2, size=3, axis=-1), size=3, axis=-2)
    over = (power / from_db(at_hz(GATE_THRESHOLD, hz))[:, None] ** 2) ** 2
    gain = np.maximum(over / (1 + over), from_db(floor_db))
    return signal.istft(frames * gain, **framing)[1][:, :N]


def record(dry):
    """Quiet bands are suppressed; the deep bass and the very top are cut."""
    low_cut = signal.butter(2, 58, "high", fs=SR, output="sos")
    top_cut = signal.ellip(10, .3, 80, 15600, fs=SR, output="sos")
    gated = suppressed(dry, floor_db=-10.5)
    return signal.sosfilt(top_cut, signal.sosfilt(low_cut, gated))


dry = scene()
out = record(dry)
generate_wav(out)
```